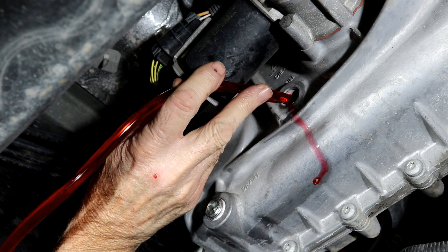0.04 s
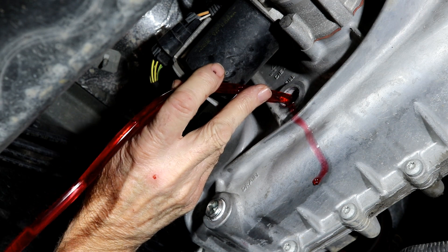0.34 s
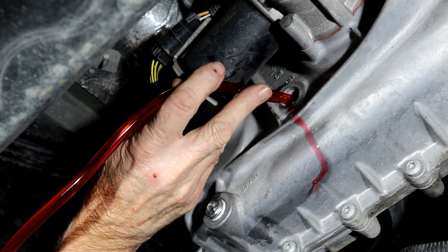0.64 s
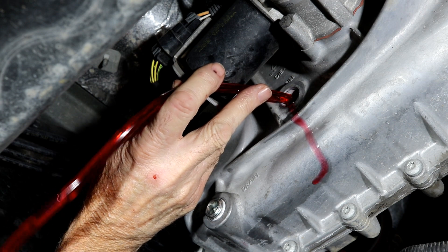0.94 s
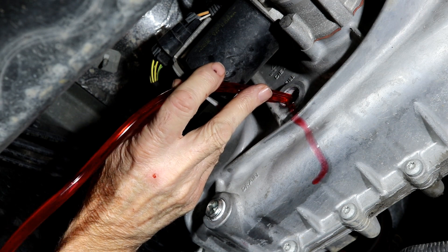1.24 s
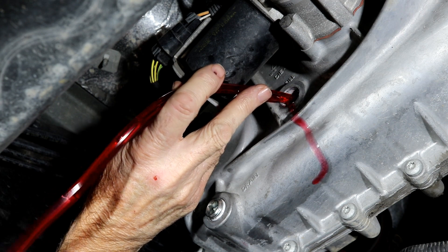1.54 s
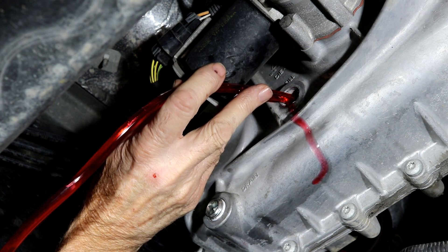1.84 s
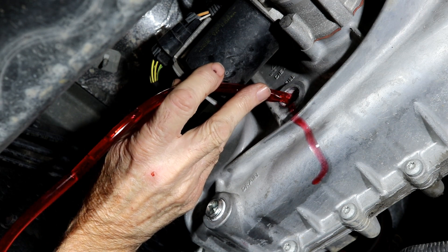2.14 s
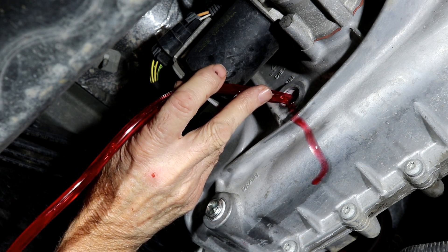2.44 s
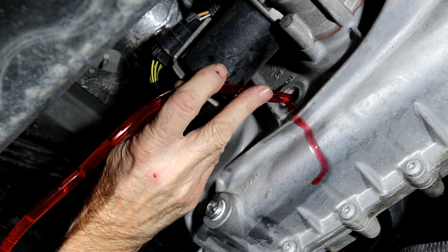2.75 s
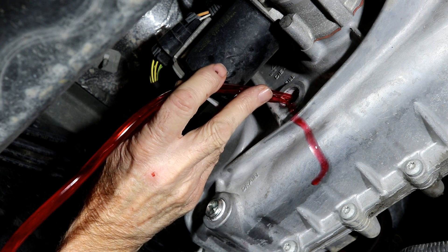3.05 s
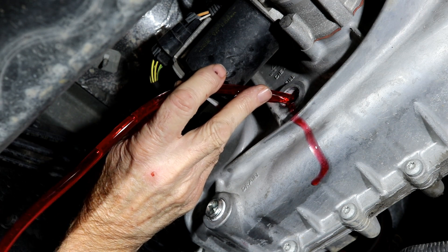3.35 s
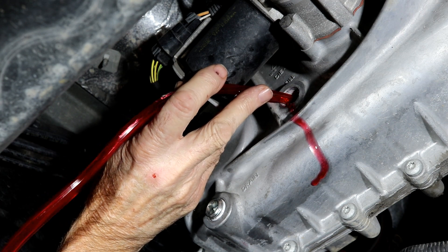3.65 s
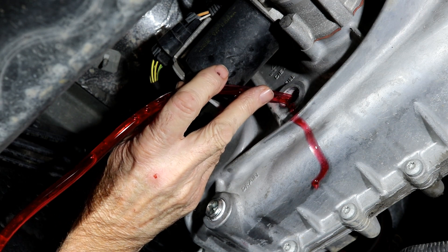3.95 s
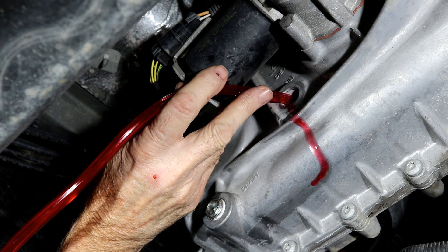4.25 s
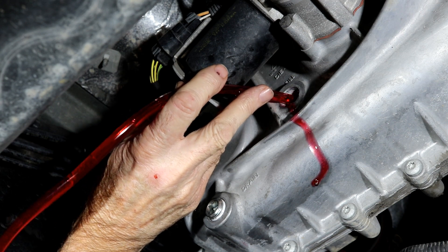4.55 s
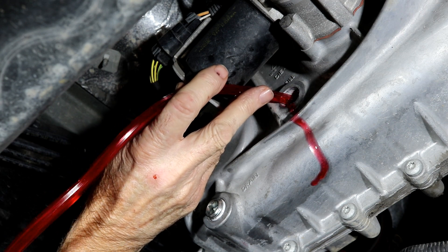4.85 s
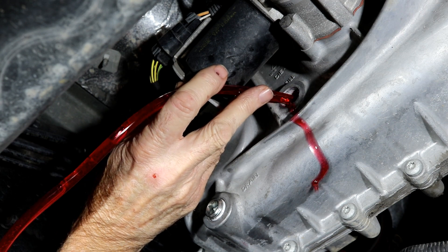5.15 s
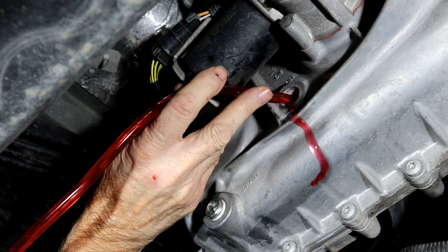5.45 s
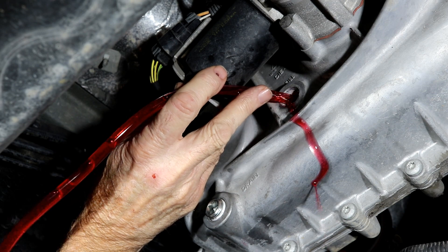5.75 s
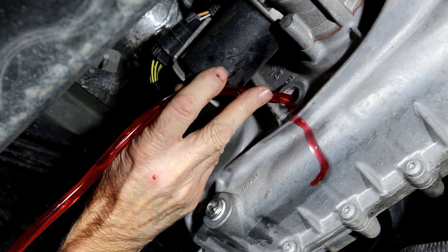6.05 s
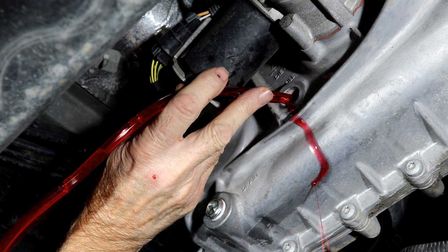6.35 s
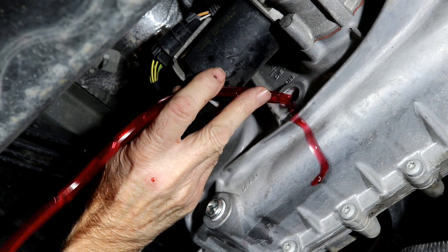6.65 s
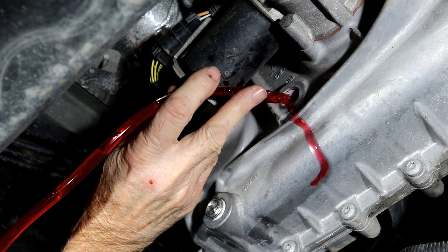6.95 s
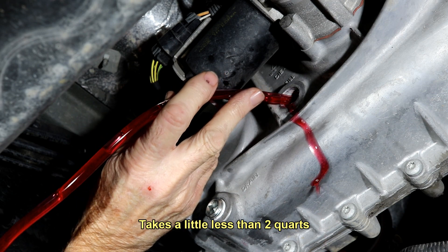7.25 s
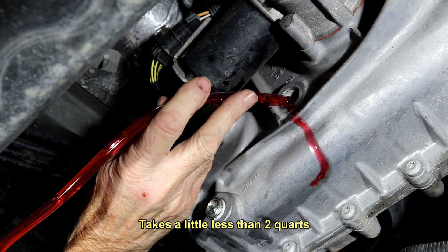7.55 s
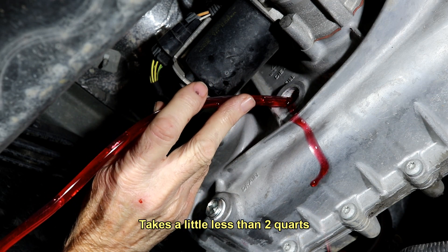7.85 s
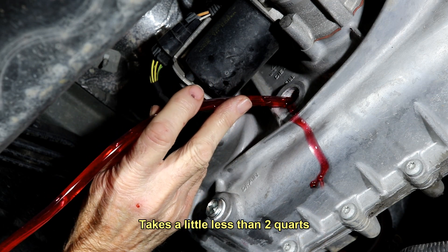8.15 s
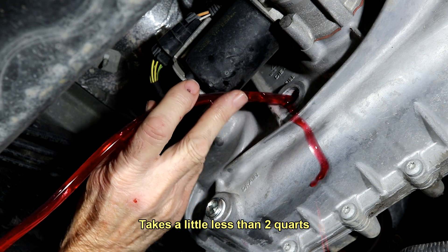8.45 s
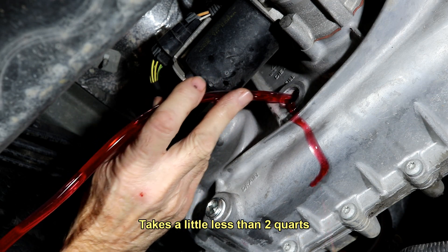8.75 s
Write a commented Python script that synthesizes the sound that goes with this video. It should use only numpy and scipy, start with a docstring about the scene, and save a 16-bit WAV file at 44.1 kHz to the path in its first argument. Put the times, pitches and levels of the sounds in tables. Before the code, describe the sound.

Sharp valve snaps, dull thumps and small oily gurgles from a plastic hand pump worked under a car, ending in quiet taps.

```python
"""In a garage, under a car: a plastic hand pump pushes oil up a tube into a gearbox.
Each turn of the plunger gives a dull pressure thump, then a sharp valve snap. Going down, the plunger
rasps in tiny slips; springing back, it gulps oil and air, and the air pockets collapse with a clatter.
Oil plops in the bottle. After the last stroke, light taps and a shifting hand are left.
The gap between floor and underbody booms; the air murmurs throughout."""
import sys
import numpy as np
from scipy import signal
from scipy.fft import rfft, irfft
from scipy.io import wavfile

SR = 44100
rng = np.random.default_rng(int(sys.argv[2]) if len(sys.argv) > 2 else 0)


def generate_wav(signal):
    """Clip the signal to [-1, 1] and save it as 16-bit WAV at the path in sys.argv[1]."""
    frames = np.transpose(np.atleast_2d(signal))
    scaled = np.clip(frames, -1, 1) * 32767
    pcm = np.round(scaled).astype(np.int16)
    wavfile.write(sys.argv[1], SR, pcm)


N = 392931
SPAN = 8192  # samples per event
AGE_S = np.arange(SPAN) / SR


# Plunger down: start_s, thump_db, snap_after_s, snap_db, catch_after_s, catch_db,
# slide_db, slide_s, stop_db
PUSHES = [(0.086, -34, .0099, -25.5, .111, -43, -47, .059, -46.5),
          (0.6696, -34, .0108, -27, .118, -43.5, -54, .053, -45.5),
          (1.2891, -28.5, .0079, -25.5, .110, -43, -54, .038, -47),
          (1.8934, -32.5, .0112, -27.5, .103, -43, -54, .030, -52),
          (2.4246, -33.5, .0080, -21, .093, -43, -46.5, .083, -43),
          (3.062, -25.5, .0089, -25.5, .100, -45.5, -53, .048, -51.5),
          (3.6247, -31.5, .0115, -21, .110, -46.5, -46, .070, -43.5),
          (4.2112, -33, .0096, -28, .084, -45, -46, .068, -50),
          (4.7962, -33, .0082, -24, .108, -44.5, -52.5, .052, -52),
          (5.3544, -31.5, .0092, -26.5, .089, -42, -50, .050, -47.5),
          (5.8847, -34.5, .0083, -24, .102, -43, -52, .041, -45),
          (6.4264, -30.5, .0112, -26.5, .089, -51, -60, .015, -41.5)]
# Plunger back: start_s, thump_db, snap_after_s, snap_db, pocket_body_db, pocket_crack_db, gulp_db
RETURNS = [(0.4024, -36, 0.0083, -27.5, -35.5, -31, -48), (1.0029, -36.5, 0.0091, -39.5, -39, -35.5, -45.5),
           (1.5982, -36.5, 0.012, -31, -41, -34, -47), (2.1586, -37, 0.0071, -30, -46, -35.5, -47),
           (2.7362, -32.5, 0.0085, -28.5, -46, -28.5, -45), (2.9241, -41.5, 0.021, -51, -37, -30.5, -60),
           (3.3428, -34.5, 0.0062, -29.5, -37, -31, -54), (3.5085, -33.5, 0.008, -57, -41, -33, -69),
           (3.908, -36, 0.0097, -37, -37.5, -32.5, -42.5), (4.4927, -33.5, .0054, -36, -38, -32.5, -45),
           (5.0787, -32, 0.01, -30.5, -40.5, -35, -46), (5.615, -37.5, .0072, -35.5, -48, -41, -44),
           (6.1689, -36, 0.014, -35, -40.5, -32.5, -44), (6.7126, -32.5, 0.0063, -32.5, -45, -33, -51)]

def thumps(scatter_db=-5, scatter_t60_s=0.096, rebound_s=0.039):
    """A jolt at each turn, reflected by nearby parts; the oil column rebounds twice, more weakly."""
    out = np.zeros(N)
    for start_s, level_db, *_ in PUSHES + RETURNS:
        reflections = rng.standard_normal(SPAN) * fade(AGE_S, scatter_t60_s) * (AGE_S > 0.002)
        paths = from_db(scatter_db) * unit(reflections)
        paths[0] = 1
        add(out, start_s, from_db(level_db + 6) * signal.fftconvolve(jolt(), paths))
        bottle_bump = ring(230 * rng.normal(1, 0.058), t60_s=0.09)
        add(out, start_s + 0.00092, from_db(level_db - 12) * bottle_bump)
        seal_crunch = grains(rate_per_s=8000, spread_db=2) * fade(AGE_S, 0.012)
        add(out, start_s + 0.0005, from_db(level_db - 12) * colour(seal_crunch, CRACK, vary_db=7.5))
        delay_s = rebound_s * rng.uniform(0.85, 1.25)
        add(out, start_s + delay_s, from_db(level_db - 7.5) * jolt())
        add(out, start_s + 1.4 * delay_s, from_db(level_db - 17.5) * jolt())
    return out


def jolt(start_hz=1400, end_hz=420, glide_s=0.0011, swell_s=0.00086):
    """A pressure pulse spread by the soft tube: highs arrive first, so the pitch drops."""
    pitch_hz = end_hz + (start_hz * rng.uniform(0.85, 1.15) - end_hz) * np.exp(-AGE_S / glide_s)
    envelope = rise(AGE_S, swell_s) ** 2 * np.exp(-AGE_S / (2 * swell_s))
    return -4 * envelope * np.sin(2 * np.pi * np.cumsum(pitch_hz) / SR)


# Valve snap spectra: freq_hz, density_db
OUTLET = [(100, -1.5), (1000, -3), (2200, -10.5), (3200, -3.5), (4300, -1.5), (5800, -12.5), (7400, 0),
          (9700, -11), (12000, -4), (14400, -1.5), (16000, 4.5)]
INLET = [(100, -27), (1500, 3), (2200, -6), (3100, 3), (5200, -3), (7500, -5), (9000, 7.5), (9800, 2),
         (11000, 5.5), (12200, -4.5), (14000, 3), (16000, -13)]
# Plastic around each valve: pitch_hz, level_db, t60_s
OUTLET_MODES = [(3250, -33, .08), (6950, -27, .08), (7400, -27, .04), (11100, -31, .05)]
INLET_MODES = [(2970, -27, .06), (3235, -27, .07), (6210, -25, .08), (9020, -22, .045), (10980, -26, .04)]

def valve(strokes, spectrum, modes, gain_db, scatter_t60_s, bounce_s=0.0052, bounce_loss_db=7):
    """The flap slaps its seat and bounces once: a bright crack, and the plastic rings."""
    out = np.zeros(N)
    for start_s, _, snap_after_s, snap_db, *_ in strokes:
        for delay_s, loss_db in ((0, 0), (bounce_s * rng.uniform(0.7, 1.3), bounce_loss_db)):
            crack = impact(spectrum, vary_db=1.5, scatter_db=0, scatter_t60_s=scatter_t60_s)
            plastic = sum(from_db(mode_db - 13) * ring(pitch_hz * rng.normal(1, 0.006), t60_s)
                          for pitch_hz, mode_db, t60_s in modes)
            snap = from_db(snap_db + gain_db - loss_db) * (crack + plastic)
            add(out, start_s + snap_after_s + delay_s, snap)
    return out


# Plunger friction spectrum: freq_hz, density_db
RASP = [(100, 3.5), (450, 9.5), (1100, 4), (2100, -5), (3300, 6), (4400, 3), (5400, -2), (7000, 1),
        (9100, 0.5), (12000, -1.5), (14500, 5.5), (16000, -2)]

def downstrokes(run_in_s=0.035, run_out_s=0.035, end_speed=0.32, ticks_after_s=0.067, tick_count=3):
    """The plunger rasps in clumps of slips; oil squelches, tiny bubbles burst, the spring ticks."""
    out = np.zeros(N)
    for start_s, _, _, _, catch_after_s, catch_db, slide_db, slide_s, stop_db in PUSHES:
        catch_s = start_s + catch_after_s
        stop_s = catch_s + slide_s
        speed = np.interp(AGE_S, np.cumsum([0, run_in_s, slide_s, run_out_s]), [0, 1, end_speed, 0])
        grip_db = np.interp(AGE_S, np.linspace(0, AGE_S[-1], 30), rng.normal(0, 3, 30))
        slips = grains(rate_per_s=5000, spread_db=3) * speed * from_db(grip_db)
        add(out, catch_s - run_in_s, from_db(slide_db - 2.5) * colour(slips, RASP, vary_db=1))
        squelch = grains(rate_per_s=230, spread_db=5.5) * speed
        add(out, catch_s, from_db(slide_db - 4) * colour(squelch, KNOCK, vary_db=2.5))
        crackle = grains(rate_per_s=180, spread_db=6) * speed
        add(out, catch_s - run_in_s / 2, from_db(slide_db - 10) * colour(crackle, CRACK, vary_db=10))
        add(out, catch_s, from_db(catch_db) * spring_tick())
        add(out, stop_s, from_db(stop_db) * spring_tick())
        for progress in (np.arange(tick_count) + rng.random(tick_count)) / tick_count:
            tick_s = np.interp(progress, [0, 1], [start_s + ticks_after_s, stop_s + run_out_s / 2])
            add(out, tick_s, from_db(slide_db + rng.normal(-2.5, 6.5)) * spring_tick())
    return out


def spring_tick(rise_s=0.00033, t60_s=0.036, crack_after_s=0.0022):
    """The spring catches and frees a burst of slips; a small crack rings the barrel."""
    slips = grains(rate_per_s=5000, spread_db=3) * rise(AGE_S, rise_s) * fade(AGE_S, t60_s)
    burst = from_db(8) * colour(slips, RASP, vary_db=2)[:SPAN]
    crack = from_db(3.5) * impact(CRACK, vary_db=16, scatter_db=8, scatter_t60_s=0.067)
    crack += from_db(-1) * barrel()
    return burst + np.interp(AGE_S - crack_after_s, AGE_S, crack, left=0)


# Froth spectrum: freq_hz, density_db
GULP = [(80, -15), (240, 0.5), (310, -5.5), (410, 9.5), (1000, -9), (1300, 7.5), (1700, 2.5), (2200, -5.5),
        (3100, -1), (4900, -6), (5700, -8.5), (15000, -18)]
# Large air pockets, late in a stroke: start_s, body_db, crack_db
BIG_POCKETS = [(0.214, -46, -63), (0.224, -56, -59), (1.044, -34, -40), (1.055, -39, -43),
               (1.436, -49.5, -50), (1.6276, -37, -40), (1.65, -40, -45), (2.1934, -40, -42),
               (2.2278, -46.5, -54), (2.7694, -40.5, -50), (2.7842, -40.5, -48), (3.3723, -39, -38),
               (3.3784, -37, -40), (3.534, -49, -38), (3.941, -37, -39), (3.9618, -43, -44),
               (4.341, -52, -55), (4.5596, -37, -39), (5.113, -41.5, -38), (5.6497, -49, -43),
               (5.6786, -43.5, -46), (6.2336, -38, -36), (6.2427, -41, -48.5), (6.747, -40, -42),
               (6.7712, -45, -44.5)]
# Singing bubbles: start_s, level_db, pitch_hz
BUBBLES = [(2.532, -39, 1150), (3.187, -37.5, 1126), (3.977, -32, 414), (4.425, -52, 2200),
           (5.477, -35, 1140), (5.7, -33.5, 425), (6.01, -37, 1140), (6.75, -36, 1042)]

def refills(first_ring_hz=1720, later_ring_hz=960, pocket_count=5, gap_s=0.017, fade_db_per_s=129):
    """The barrel sucks in oil and air: dying froth, collapsing pockets, a few singing bubbles."""
    out = np.zeros(N)
    suction = rise(AGE_S, 0.0032) * fade(AGE_S, t60_s=0.19)
    for start_s, _, _, _, body_db, crack_db, gulp_db in RETURNS:
        first_pocket_s = start_s + 0.0118
        add(out, first_pocket_s, collapse(body_db, crack_db, first_ring_hz * rng.normal(1, 0.015)))
        froth = grains(rate_per_s=800, spread_db=4) * suction
        add(out, first_pocket_s + 0.0016, from_db(gulp_db + 6) * colour(froth, GULP, vary_db=4.5))
        for delay_s in gap_s * (np.arange(pocket_count) + 0.5 + rng.random(pocket_count)):
            pocket_db = gulp_db - fade_db_per_s * delay_s + rng.normal(0, 2)
            small_pocket = collapse(pocket_db + 1.5, pocket_db - 5, later_ring_hz * rng.normal(1, 0.1))
            add(out, first_pocket_s + delay_s, small_pocket)
    for start_s, body_db, crack_db in BIG_POCKETS:
        add(out, start_s, collapse(body_db, crack_db, later_ring_hz * rng.normal(1, 0.1)))
    for start_s, level_db, pitch_hz in BUBBLES:
        add(out, start_s, from_db(level_db) * ring(pitch_hz, t60_s=0.11) * rise(AGE_S, 0.0024))
    return out


# Knock and crack spectra inside the pump: freq_hz, density_db
KNOCK = [(100, -28.5), (310, -13.5), (430, 0), (700, -10), (1000, -1.5), (1300, -10.5), (1700, -9),
         (2200, -19), (5000, -36), (12000, -67)]
CRACK = [(300, -15), (2200, -10.5), (3100, 0.5), (4000, -4.5), (4900, -10.5), (5700, -22), (15000, -38.5)]

def collapse(body_db, crack_db, tube_hz):
    """An air pocket collapses: a hollow knock and a crack; tube and barrel ring."""
    knock = from_db(26) * impact(KNOCK, vary_db=3, scatter_db=-1, scatter_t60_s=0.05)
    crack = from_db(17.5) * impact(CRACK, vary_db=3, scatter_db=2, scatter_t60_s=0.025)
    tube = from_db(2.5) * ring(tube_hz, t60_s=0.058)
    return from_db(body_db) * (knock + tube) + from_db(crack_db) * (crack + barrel())


# Barrel resonances: pitch_hz, level_db, t60_s
BARREL_MODES = [(2740, -8, 0.042), (2930, -25, 0.034), (3028, -4, 0.032), (3277, -4.5, 0.051),
                (4200, -20, .03), (5120, -16, 0.029)]

def barrel(vary_db=3):
    """The plastic barrel rings briefly, each mode struck differently every time."""
    return sum(from_db(level_db + rng.normal(0, vary_db)) * rng.choice([-1, 1]) * ring(pitch_hz, t60_s)
               for pitch_hz, level_db, t60_s in BARREL_MODES)


# Oil plops after some pushes: start_s, level_db
PLOPS = [(0.886, -43), (1.469, -38), (2.05, -42), (4.411, -41.5), (4.958, -48), (5.556, -45.5),
         (6.088, -43.5)]

def plops(pitch_hz=540, t60_s=0.17):
    """Oil falls back in the bottle: a soft jolt with a low ring."""
    out = np.zeros(N)
    for start_s, level_db in PLOPS:
        plop = jolt() + from_db(-7) * ring(pitch_hz * rng.normal(1, 0.07), t60_s)
        add(out, start_s, from_db(level_db) * plop)
    return out


# Taps on metal: start_s, level_db, pitch_hz, t60_s
TAPS = [(7.178, -54, 2000, .04), (7.677, -43, 1600, .07), (7.728, -59, 1150, .06), (8.335, -58, 178, .2),
        (8.56, -55, 720, .06), (8.598, -53, 200, .15)]

def taps():
    """Light touches on the housing: a faint tick with a short ring."""
    out = np.zeros(N)
    for start_s, level_db, pitch_hz, t60_s in TAPS:
        spectrum = np.c_[pitch_hz * np.array([0.5, 1, 1.6, 3, 30]), [-14, 0, -20, -28, -50]]
        tick = from_db(18) * impact(spectrum, vary_db=2, scatter_db=3, scatter_t60_s=t60_s)
        add(out, start_s, from_db(level_db) * (ring(pitch_hz, t60_s) + tick))
    return out


# Hand envelope: time_s, level_db
HAND_LEVEL = [(8.38, -83), (8.44, -59.5), (8.52, -61), (8.6, -67), (8.7, -77)]
# Skin friction spectrum: freq_hz, density_db
RUB = [(200, -9), (600, 8.5), (1800, 0.5), (3200, -7), (5500, -11), (8000, -16), (15000, -24)]

def hand():
    """Skin slides along the tube with a soft swish."""
    level_db = np.interp(np.arange(N) / SR, *np.transpose(HAND_LEVEL), left=-np.inf, right=-np.inf)
    return from_db(level_db) * colour(rng.standard_normal(N), RUB, vary_db=5)[:N]


# Floor-to-underbody resonances: pitch_hz, level_db, t60_s
UNDERBODY_MODES = [(116.4, -47, 0.26), (165.4, -64, 0.46), (247.6, -39, 0.12), (403.7, -47, 0.2),
                   (496.3, -54.5, 0.24)]
# Reverb spectrum: freq_hz, level_db
TAIL_LEVEL = [(80, 6), (250, -3.5), (600, -23), (1500, -12.5), (3500, -11), (8000, -14.5), (15000, -14.5)]
# Reverb decay: freq_hz, t60_s
TAIL_DECAY = [(80, 1), (300, 0.75), (1000, 0.31), (4000, 0.33), (15000, 0.26)]

def garage(direct):
    """Boom between floor and underbody, plus a diffuse tail whose lows last longest."""
    age_s = np.arange(SR) / SR
    response = sum(from_db(level_db - 5) * ring(pitch_hz, t60_s, age_s)
                   for pitch_hz, level_db, t60_s in UNDERBODY_MODES)
    edges_hz = np.geomspace(50, 17000, 15)
    for low_hz, high_hz in zip(edges_hz, edges_hz[1:]):
        centre_hz = np.sqrt(low_hz * high_hz)
        bandpass = signal.butter(2, [low_hz, high_hz], "band", fs=SR, output="sos")
        band = signal.sosfilt(bandpass, rng.standard_normal(SR))
        envelope = unit(fade(age_s, at_hz(TAIL_DECAY, centre_hz)) * rise(age_s, 0.0027))
        response += from_db(at_hz(TAIL_LEVEL, centre_hz)) * band * envelope
    return signal.fftconvolve(direct, response)[:N]


# Air spectrum: freq_hz, density_db
AIR = [(20, -9), (45, -4), (75, -7), (130, -3), (200, -5.5), (270, -4), (350, -11), (700, -12.5),
       (1400, -15.5), (3000, -25), (6000, -30), (15500, -29)]
# Air envelope: time_s, level_db
AIR_LEVEL = [(0, -63), (6.7, -63.5), (7.0, -62), (7.6, -62), (7.95, -65), (8.3, -62.5), (8.9, -62.5)]

def air():
    """Still garage air: a low murmur with a faint hiss."""
    noise = colour(rng.standard_normal(N + SPAN), AIR, vary_db=1)[SPAN:SPAN + N]
    level_db = np.interp(np.arange(N) / SR, *np.transpose(AIR_LEVEL))
    return from_db(level_db) * unit(noise) * np.sqrt(N)


def impact(spectrum, vary_db, scatter_db, scatter_t60_s):
    """A pulse with dense reflections inside the pump and off nearby parts."""
    paths = from_db(scatter_db) * unit(rng.standard_normal(SPAN) * fade(AGE_S, scatter_t60_s))
    paths[0] = 1  # direct path
    return colour(paths, spectrum, vary_db)[:SPAN]


def colour(excitation, spectrum, vary_db):
    """Convolve with a minimum-phase pulse of energy 1, its spectrum varied on each call."""
    freq_hz = np.arange(SPAN // 2 + 1) * SR / SPAN
    knots_hz = np.geomspace(100, 16000, 36)
    ripple_db = at_hz(np.c_[knots_hz, rng.normal(0, vary_db, len(knots_hz))], freq_hz)
    cepstrum = irfft(np.log(from_db(at_hz(spectrum, freq_hz) + ripple_db)))
    cepstrum[1:SPAN // 2] *= 2  # fold onto positive time
    cepstrum[SPAN // 2 + 1:] = 0
    pulse = unit(irfft(np.exp(rfft(cepstrum))))
    return signal.fftconvolve(excitation, pulse)


def grains(rate_per_s, spread_db):
    """Random clicks of uneven size; rms 1."""
    sizes = from_db(spread_db * np.minimum(rng.exponential(1, SPAN), 4))
    signs = rng.choice([-1, 1], SPAN)
    hits = rng.random(SPAN) < rate_per_s / SR
    return unit(sizes * signs * hits) * np.sqrt(SPAN)


def ring(pitch_hz, t60_s, age_s=AGE_S):
    """A struck mode: a decaying sine."""
    return np.sin(2 * np.pi * pitch_hz * age_s) * fade(age_s, t60_s)


def rise(age_s, rise_s):
    """Exponential attack towards 1."""
    return 1 - np.exp(-age_s / rise_s)


def fade(age_s, t60_s):
    """Exponential decay, 60 dB in t60_s."""
    return np.exp(-np.log(1000) * age_s / t60_s)


def at_hz(table, freq_hz):
    """Read a table on a log-frequency axis."""
    knots_hz, values = np.transpose(table)
    return np.interp(np.log(np.maximum(freq_hz, 1)), np.log(knots_hz), values)


def from_db(level_db):
    """Decibels to gain."""
    return 10 ** (np.asarray(level_db) / 20)


def unit(sound):
    """Scale to energy 1."""
    return sound / np.sqrt(np.sum(sound ** 2) + 1e-20)


def add(out, start_s, sound):
    """Mix a sound in at start_s."""
    start = max(int(start_s * SR), 0)
    out[start:start + len(sound)] += sound[:max(N - start, 0)]


def scene(low_cut_hz=75):
    """Pump, taps and hand in the garage; their deepest bass is rolled off gently."""
    outlet = valve(PUSHES, OUTLET, OUTLET_MODES, gain_db=20, scatter_t60_s=0.025)
    inlet = valve(RETURNS, INLET, INLET_MODES, gain_db=20.5, scatter_t60_s=0.014)
    direct = thumps() + outlet + inlet + downstrokes() + refills() + plops() + taps() + hand()
    direct = signal.sosfilt(signal.butter(2, low_cut_hz, "high", fs=SR, output="sos"), direct)
    return (direct + garage(direct) + air())[None]


def record(dry, cutoff_hz=15950):
    """Steep low-pass."""
    lowpass = signal.firwin(151, cutoff_hz, fs=SR, window="blackman")
    return signal.fftconvolve(dry, lowpass[None], mode="same")


dry = scene()
out = record(dry)
generate_wav(out)
```